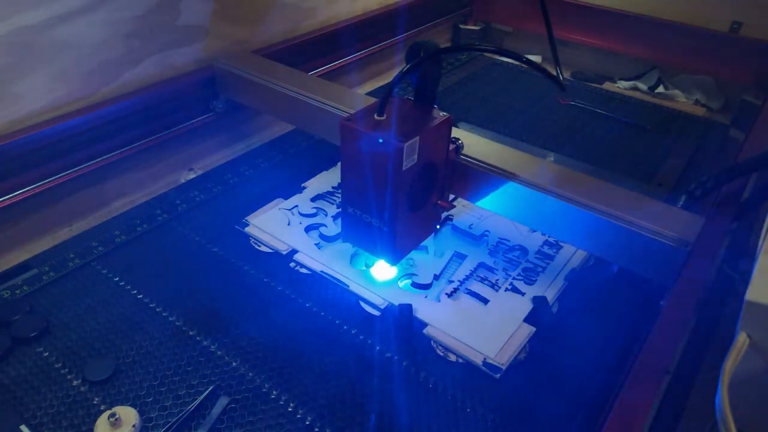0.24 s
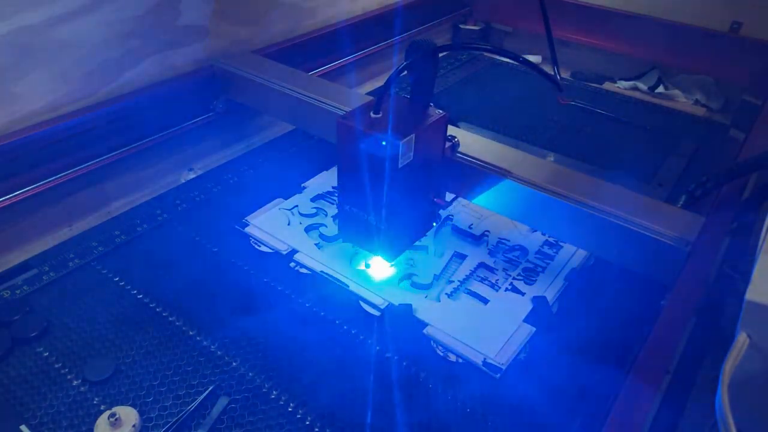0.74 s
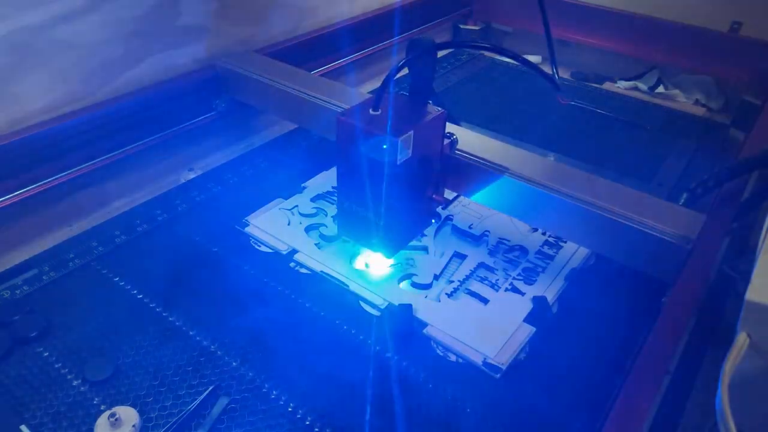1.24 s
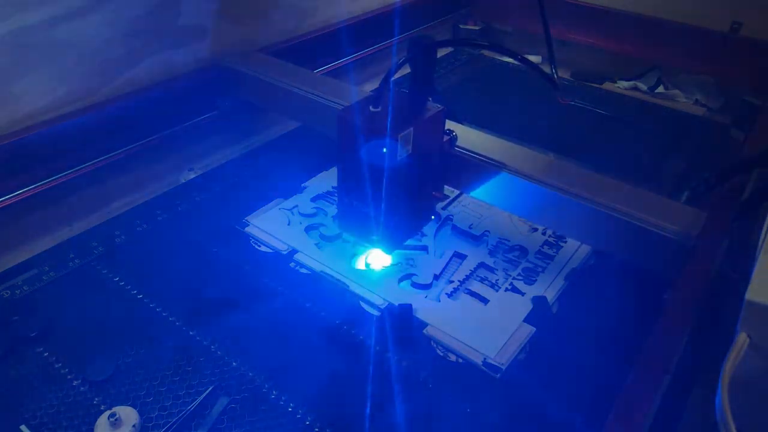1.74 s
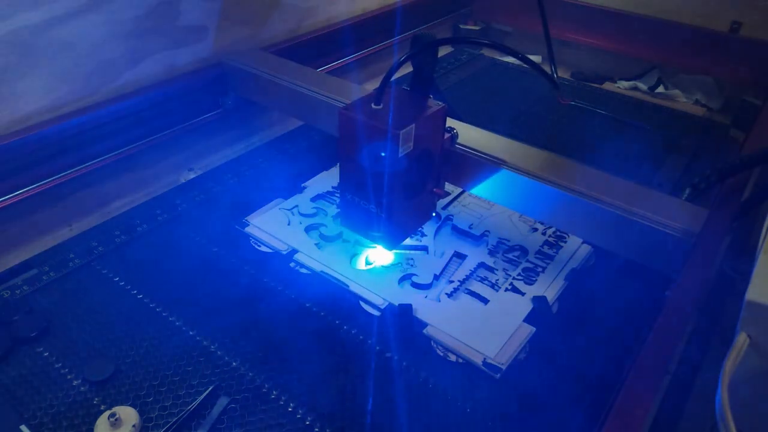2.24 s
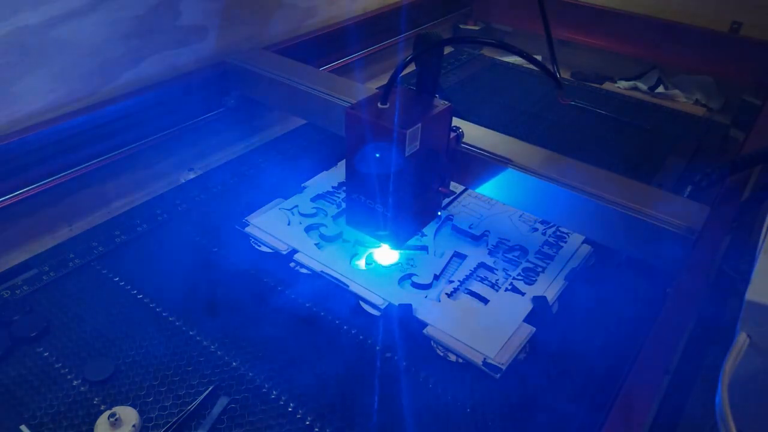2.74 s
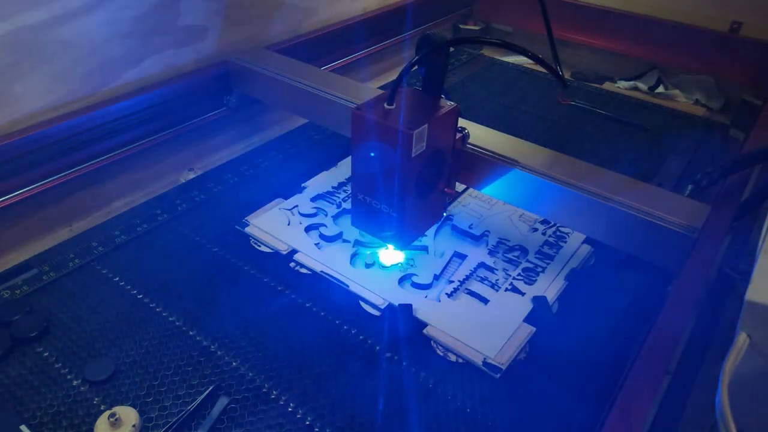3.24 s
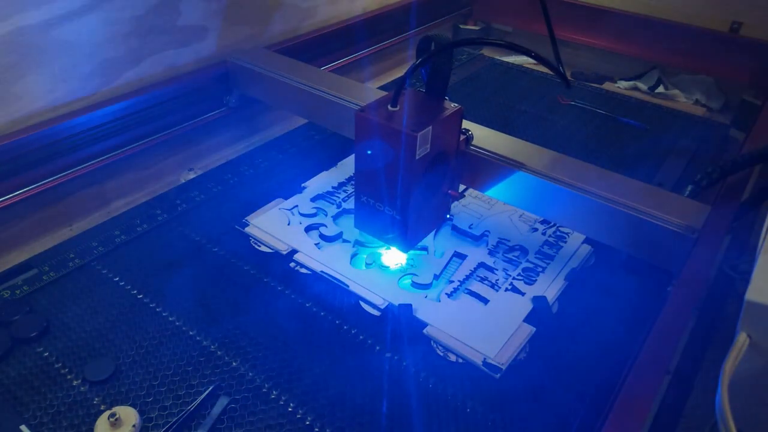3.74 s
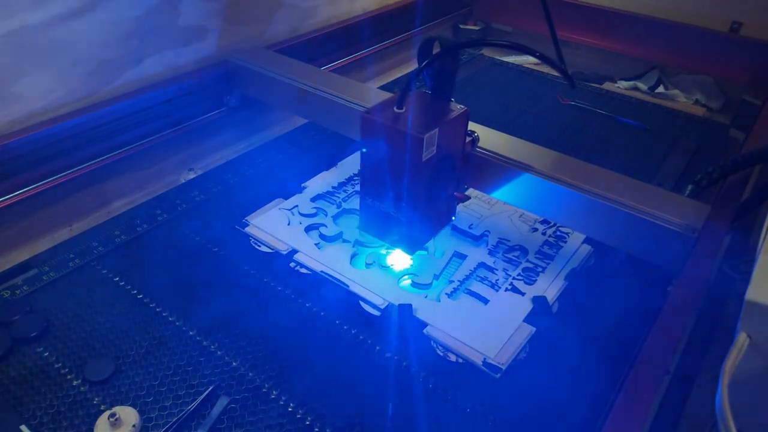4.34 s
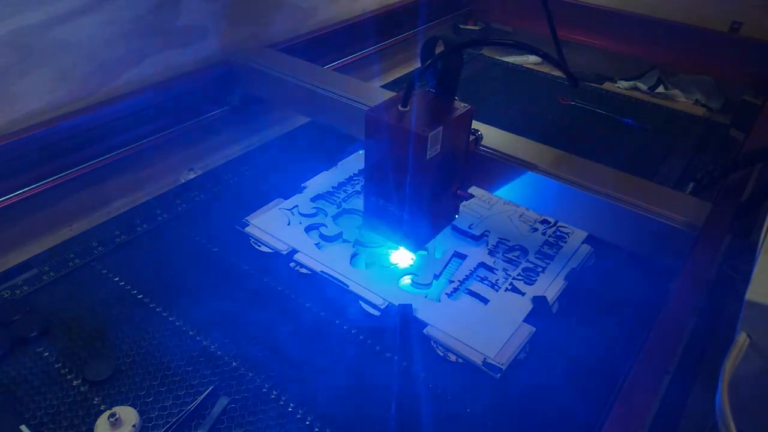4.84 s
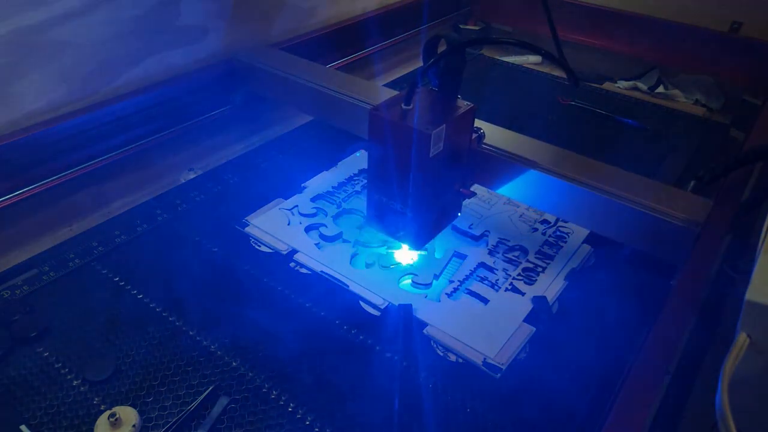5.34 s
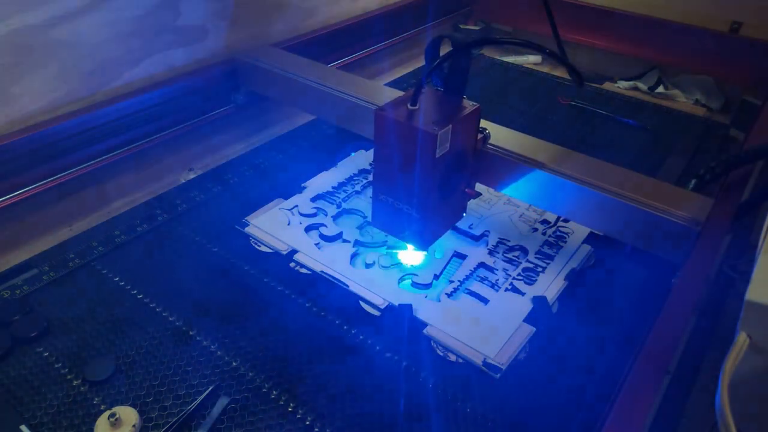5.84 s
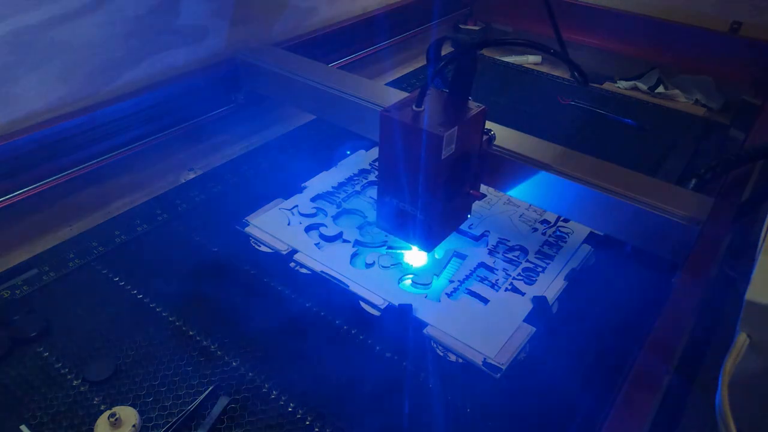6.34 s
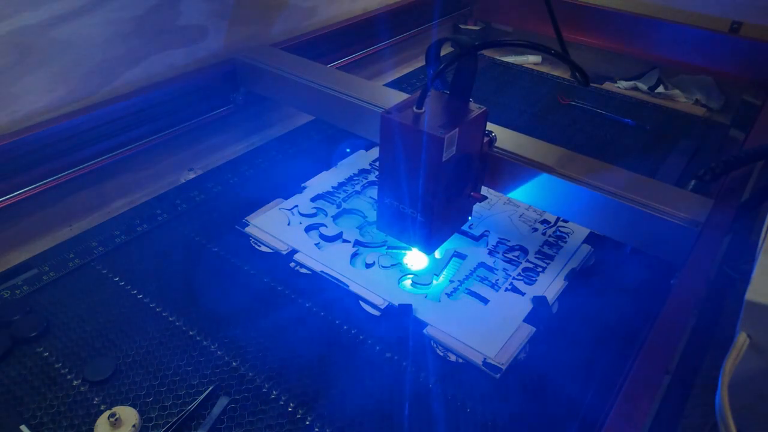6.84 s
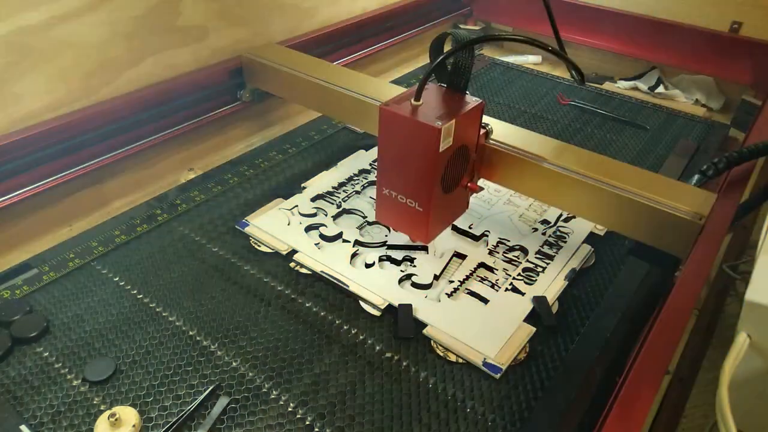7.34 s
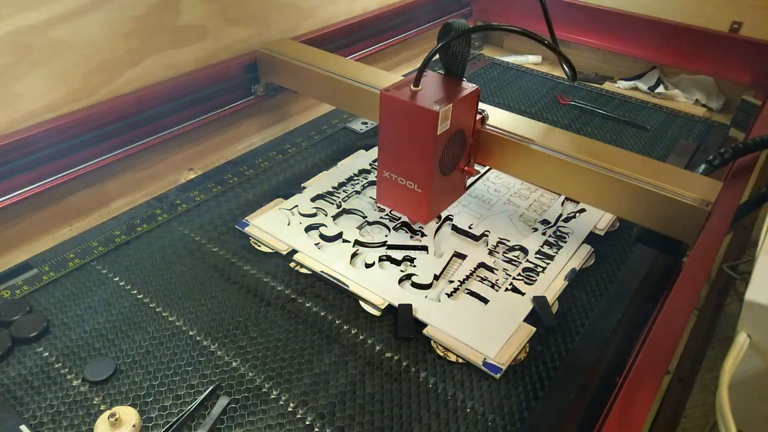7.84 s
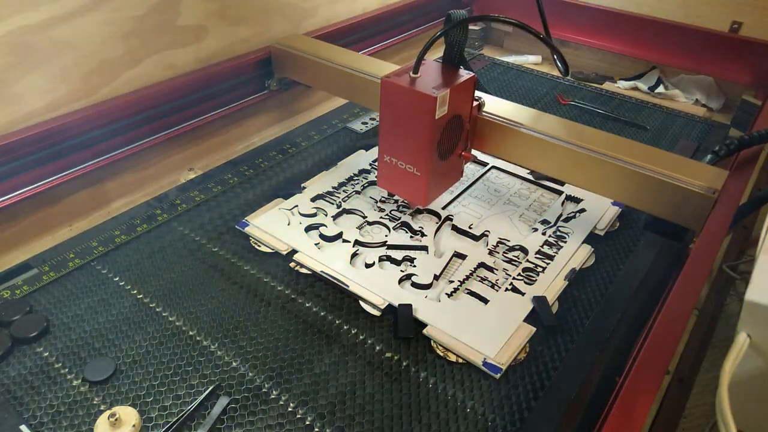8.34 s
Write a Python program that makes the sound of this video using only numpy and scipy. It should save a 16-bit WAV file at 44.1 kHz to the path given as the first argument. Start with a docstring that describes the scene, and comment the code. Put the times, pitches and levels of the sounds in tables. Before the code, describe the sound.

Close up, a small laser cutter squeals with swimming high-pitched overtones amid rushing air and fan whine; the squeal stops abruptly while the airflow continues.

```python
"""The chopped beam of a small laser cutter sings: three steady overtones of its pulse rate, until it stops.
Two nine-blade fans in the head whine at multiples of their shaft turn, and an air jet hisses as noise bands.
Shaped noise makes the exhaust rush, box modes and dull bumps; sines make the pump hum.
The beam and the loud fan tones meet echoes that slide in and out of step as the head moves, so they swim
differently at each of two microphones close by."""
import sys
import numpy as np
from scipy import signal
from scipy.fft import rfft, irfft, next_fast_len
from scipy.io import wavfile
from scipy.ndimage import uniform_filter1d

SR = 44100
rng = np.random.default_rng(int(sys.argv[2]) if len(sys.argv) > 2 else 0)


def put_to_file(sound):
    """Save the sound as 16-bit audio at rate SR, in the file named by the first command-line argument."""
    columns = np.atleast_2d(sound).T  # one column per channel
    safe = np.clip(columns, -1, 1)
    whole_steps = np.round(safe * 32767)
    wavfile.write(sys.argv[1], SR, whole_steps.astype(np.int16))


N = 378819
STEP = 32  # samples between updates of the head position and its echoes

# Path of the head over the bed. Each row: time in seconds, across in cm, along in cm.
HEAD_PATH = [(0.0, 1.55, 0.76), (0.3, 1.54, 1.05), (0.6, 1.14, 1.53), (1.2, 0.51, 0.96), (1.8, 0.38, 0.94),
             (2.3, 0.16, 0.22), (2.8, 0.44, 0.08), (3.4, 1.42, -0.21), (3.9, 2.1, -0.81),
             (4.5, 2.18, -1.04), (4.75, 2.24, -1.21), (5.1, 2.47, -1.11), (5.7, 2.76, -1.42),
             (6.4, 3.5, -1.95), (6.9, 3.57, -1.72), (7.25, 3.38, -1.48), (7.4, 3.74, -0.26),
             (7.55, 3.74, -0.16), (7.85, 3.78, 0.77), (8.05, 4.16, 0.52), (8.2, 4.37, 0.26),
             (8.4, 4.65, 0.01), (8.59, 4.8, -0.08)]
# The jet's strongest whistle, and its top band on the left. Each row: time in seconds,
# whistle level on the right in dB, change of the top band's left level in dB.
WHISTLE_LEVELS = [(0, -41, -9), (2.1, -51, -5), (2.6, -45, -5), (3.2, -44, -1.5), (5.2, -46, -4.5),
                  (5.6, -29.5, 3), (6.3, -23, -1), (6.8, -37, -6), (7.3, -42, -6), (7.48, -28, -5),
                  (7.62, -49, -14), (8.59, -37.5, -9)]
# How alike noise is on both sides. Each row: frequency in Hz, likeness from 0 to 1.
SIDE_LIKENESS = [(60, .9), (130, 0.96), (290, 0.9), (640, 0.35), (1400, 0.17), (3000, 0.74), (16000, 1)]


def undb(db):
    """Turn decibels into gain."""
    return 10 ** (np.asarray(db) / 20)


def columns(table):
    """Draw each column after the time as a curve at the sample rate."""
    seconds, *values = np.transpose(table)
    return np.array([np.interp(np.arange(N) / SR, seconds, v) for v in values])


def unit(x):
    """Scale to an rms of 1."""
    return x / np.sqrt(np.mean(x ** 2, axis=-1, keepdims=True))


def walk(rate):
    """Wander at random: levels held for 1 / rate seconds, smoothed twice, with a spread near 1."""
    hold = int(SR / rate)
    steps = np.repeat(rng.standard_normal(N // hold + 1), hold)
    return 1.55 * uniform_filter1d(uniform_filter1d(steps, hold), hold)[:N]


def quick(x):
    """Take the slow swings out of a random walk by subtracting its average over 0.15 s."""
    return x - uniform_filter1d(x, int(0.15 * SR), axis=-1)


def band(x, hz, width):
    """Keep a band of frequencies, with soft skirts."""
    edges = [hz - width / 2, hz + width / 2]
    return signal.sosfilt(signal.butter(2, edges, "bandpass", fs=SR, output="sos"), x)


def on_log(points, hz):
    """Read a (Hz, value) table on a log-frequency axis."""
    at, value = np.transpose(points)
    return np.interp(np.log(hz + 1), np.log(at), value)


def sides(left, right):
    """Stack a left and a right number so that they act on two channels."""
    return np.array([[left], [right]])


def apart(x):
    """Give no phase on the left and x radians on the right."""
    return np.array([0 * x, x])


def tone(turns, db, flutter_db, phase):
    """A sine in both channels, whose level flutters, most where the tone has faded."""
    flutter = quick(0.76 * walk(28) + 1.33 * walk(70) + 0.37 * np.array([walk(45), walk(45)]))
    faded_db = np.max(db, axis=-1, keepdims=True) - db
    # 0.7 of the flutter at the loudest moment, one more share for every 21 dB of fade
    depth_db = flutter_db * np.clip(0.7 + faded_db / 21, 0, 2)
    gain = unit(undb(depth_db * np.tanh(flutter / 2) * 2))
    wave = np.cos(2 * np.pi * (turns + rng.random()) + phase)
    return np.sqrt(2) * undb(db) * gain * wave


def travel():
    """Head position across and along in cm, with a fine tremor of the head on its belts."""
    shake_cm = 0.017
    path = columns(HEAD_PATH) + shake_cm * quick(np.array([walk(30), walk(30)]))
    return path[:, ::STEP]


def path_wave(hz, across, along, lag, place):
    """Phase turn of a tone over a path whose length follows the head; lag is in cycles."""
    sound_cm_s = 34300
    path_cm = across * place[0] + along * place[1]
    return np.exp(2j * np.pi * (hz * path_cm / sound_cm_s + lag))


def standing(rows, leads, hz, place):
    """Level in dB and phase per side: direct sound and echoes add or cancel as their paths change."""
    heard = []
    for (db, *echo_values), f in zip(rows, np.repeat(hz, 2)):
        paths = np.reshape(echo_values, (-1, 4))
        reflected = sum(gain * path_wave(f, *path, place) for gain, *path in paths)
        heard.append(undb(db) * (1 + reflected))
    heard = np.reshape(heard, (len(hz), 2, -1))
    heard[:, 1] *= [path_wave(f, *path, place) for f, path in zip(hz, leads)]
    level_db, phase = 20 * np.log10(np.abs(heard) + 1e-9), np.angle(heard)
    return [np.repeat(x, STEP, axis=2)[..., :N] for x in (level_db, phase)]


def beam(place):
    """The pulsed beam pops the hot surface: three overtones, roughened by burning, until it is off."""
    pulse_hz, beam_off_s = 4882.8, 7.268
    jitter_turns, trim_db = 0.027, 0.3  # timing scatter of the burning; gain over the table
    # Overtones 1 to 3, left row then right row. Each row: direct level in dB before the trim, then for
    # each of five echoes: gain, path in cm per cm across, path in cm per cm along, lag at the origin in cycles.
    beam_echoes = [(-26.0, 0.56, -1.14, -3.91, 0.29, 0.76, -1.98, -3.75, 0.85, 0.77, -0.51, -0.04, 0.55, 0.25, 3.17, 0.98, 0.2, 0.22, -3.76, -3.32, 0.52),
                   (-31.5, 0.79, 2.59, -2.85, 0.7, 1.07, 0.52, 1.59, 0.59, 0.68, 2.79, -3.19, 0.04, 1.08, -2.0, 3.59, 0.5, 1.04, -2.29, 3.76, 0.15),
                   (-24.9, 0.29, 1.77, 1.49, 0.55, 0.23, -1.11, -3.21, 0.3, 0.16, 3.37, -4.01, 0.57, 0.5, 2.88, -0.43, 0.32, 0.3, -0.39, 0.54, 0.06),
                   (-18.5, 0.13, 0.92, 4.01, 0.33, 0.15, 4.01, 0.61, 0.95, 0.4, -1.94, -1.33, 0.99, 1.31, -0.49, -0.64, 0.56, 0.58, -0.66, -2.46, 0.38),
                   (-30.1, 0.52, 1.79, 0.81, 0.07, 0.32, -2.7, -2.02, 0.41, 0.56, 1.71, -0.86, 0.46, 0.1, -1.1, 2.59, 0.61, 0.37, -1.95, -1.9, 0.74),
                   (-31.7, 0.49, -1.9, -3.02, 0.62, 0.23, 2.21, 1.79, 0.35, 0.58, -0.62, -2.24, 0.48, 0.21, 0.17, -3.54, 0.91, 1.31, -0.43, -0.83, 0.5)]
    # Lead of the right side. Each row: path in cm per cm across, in cm per cm along, lead at origin in cycles.
    beam_leads = [(-0.21, 1.19, 0.9), (0.58, 0.44, 0.59), (-0.02, 0.16, 0.84)]
    t = np.arange(N) / SR
    dbs, phases = standing(beam_echoes, beam_leads, pulse_hz * np.arange(1, 4), place)
    rough = undb(-15.0) * unit(band(rng.standard_normal(N), 233, 460))
    flutters_db, phase_drifts = (1.28, 2, 1.5), (0.3, 0.35, 0.3)
    overtones = []
    for k, db, phase, flutter_db, drift in zip((1, 2, 3), dbs, phases, flutters_db, phase_drifts):
        turns = k * pulse_hz * t + jitter_turns * walk(110)
        overtones.append(tone(turns, db + trim_db, flutter_db, phase + apart(drift * walk(10))))
    low, mid, high = overtones
    switch = np.clip((beam_off_s - t) / 0.02, 0, 1)
    return (low + mid * stutter() * (1 + rough) + high * (1 + 0.72 * rough)) * switch


def stutter():
    """Gain of the beam's second overtone, with brief irregular dips inside the listed stretches."""
    # Each row: start in seconds, end in seconds, dB per unit of the random dips.
    stretches = [(1.97, 2.42, 8), (2.69, 3.16, 10), (3.8, 4.2, 5), (4.32, 5.0, 7), (6.35, 6.95, 5)]
    t = np.arange(N) / SR
    depth_db = sum(db * (t > start) * (t < end) for start, end, db in stretches)
    dips = np.clip(quick(walk(38)), -.3, 1.5)  # negative values lift the level a little
    return undb(-uniform_filter1d(depth_db, SR // 50) * dips)


def fans(place):
    """Two fans whine; their shafts speed up when the laser stops loading the supply."""
    # Each row: time in seconds, fan A turns per second, fan B turns per second.
    shaft_speeds = [(0, 123.02, 128.13), (1.5, 122.84, 128.05), (3, 122.84, 128.06), (4.75, 123.07, 128.05),
                    (6, 122.86, 128.06), (7.25, 122.92, 128.05), (7.5, 124.06, 129.29),
                    (7.75, 124.58, 129.85), (8, 124.63, 130.0), (8.59, 124.74, 130.08)]
    # Loud tones of each fan, left row then right row. Each row: direct level in dB before a trim, then for
    # each of five echoes: gain, path in cm per cm across, path in cm per cm along, lag at the origin in cycles.
    a_echoes = [(-41.7, 1.28, -2.08, 1.79, 0.66, 0.7, -3.58, 1.72, 0.27, 0.68, 1.57, 1.67, 0.4, 0.5, 0.33, 3.48, 0.99, 0.22, -0.48, -3.98, 0.55),
                (-55.7, 1.0, -3.99, -0.85, 0.35, 0.17, 3.92, -3.21, 0.28, 0.87, -2.4, -0.89, 0.71, 0.64, -2.81, -0.28, 0.9, 0.14, -0.77, 2.55, 0.9),
                (-45.5, 0.56, -1.38, -3.9, 0.84, 0.55, -2.4, -4.0, 0.39, 0.3, 2.84, -3.32, 0.8, 0.34, -1.49, 2.65, 0.66, 0.56, 1.76, 1.03, 0.28),
                (-35.3, 0.69, 1.14, 1.1, 0.32, 0.45, -1.32, -0.63, 0.66, 0.15, 1.33, -4.0, 0.34, 0.43, 0.06, -0.38, 0.49, 0.15, -2.65, 4.0, 0.15),
                (-30.6, 1.1, 0.21, 0.11, 0.47, 0.9, 2.71, 0.98, 0.71, 0.23, 1.09, -1.33, 0.98, 0.93, 2.53, 0.55, 0.25, 0.06, -2.96, -4.0, 0.01),
                (-30.5, 1.23, 0.19, 0.12, 0.45, 0.29, 1.82, 0.88, 0.03, 0.11, 0.99, -3.55, 0.44, 0.54, 1.35, 0.72, 0.64, 0.11, 1.13, -4.0, 0.91),
                (-25.6, 1.01, -0.08, 0.09, 0.53, 0.1, 1.39, -0.56, 0.06, 0.1, -4.0, -0.88, 0.13, 0.08, -3.08, 1.61, 0.73, 0.03, 4.0, 2.94, 0.3),
                (-44.0, 0.77, -0.53, 0.44, 0.61, 0.93, -2.11, 1.04, 0.03, 0.93, -3.01, -0.79, 0.55, 0.29, 2.51, -3.83, 0.91, 0.42, 3.08, 2.55, 0.39),
                (-28.4, 0.31, -1.91, 0.55, 0.9, 1.3, 0.08, -0.27, 0.47, 0.53, -1.41, -1.06, 0.22, 0.37, -2.98, -0.01, 0.72, 0.1, 3.61, 0.86, 0.21),
                (-26.3, 0.46, -1.5, 0.77, 0.58, 0.04, 3.36, -1.51, 0.42, 0.9, -0.29, -0.11, 0.58, 0.42, -1.95, 0.57, 0.19, 0.16, 2.1, -0.73, 0.16),
                (-51.3, 0.58, -1.58, -3.71, 0.68, 0.76, 0.35, 1.43, 0.56, 1.07, 1.54, -3.52, 0.16, 0.73, 3.7, 2.66, 0.3, 0.95, 1.02, -4.0, 0.79),
                (-32.3, 0.48, -2.24, -1.41, 0.94, 0.96, 0.15, -0.11, 0.48, 0.12, -3.17, 2.05, 0.74, 0.11, -2.07, 3.52, 0.01, 0.31, -2.58, -2.15, 0.52)]
    b_echoes = [(-32.2, 1.26, 0.12, 0.76, 0.51, 0.65, -1.83, 0.69, 0.39, 0.78, -1.46, 1.65, 0.87, 0.06, 2.99, -2.8, 0.17, 0.43, 0.49, 3.31, 0.15),
                (-37.6, 0.29, -0.92, 0.24, 1.0, 0.82, 0.57, 1.27, 0.5, 0.1, 2.89, 0.74, 0.43, 0.43, -1.23, -1.86, 0.55, 0.16, -0.72, 1.45, 0.37),
                (-40.6, 1.0, 4.0, 2.7, 0.9, 0.68, 1.18, 0.11, 0.29, 0.12, 3.77, -2.58, 0.4, 0.5, -2.7, -1.0, 0.72, 1.3, 3.35, 2.23, 0.44),
                (-23.2, 0.88, -1.27, 0.08, 0.65, 0.44, -2.33, 0.14, 0.28, 0.57, 0.75, 0.11, 0.4, 0.04, -1.31, -2.29, 0.98, 0.07, -1.63, 4.0, 0.84),
                (-41.1, 0.38, -3.5, -0.72, 0.09, 1.01, 0.49, 0.19, 0.43, 1.07, -0.9, 2.62, 0.83, 0.94, -1.26, 2.36, 0.39, 0.13, -1.32, -4.0, 1.0),
                (-34.4, 0.51, 0.44, -3.03, 0.32, 0.09, 0.73, 3.15, 0.92, 0.85, -0.13, -0.08, 0.51, 0.12, 2.9, -0.35, 0.4, 0.43, 0.18, -3.54, 0.87),
                (-48.1, 1.21, -0.36, -0.96, 0.54, 0.57, -0.72, -2.04, 0.07, 0.61, 0.04, 2.65, 0.82, 0.4, -1.79, 3.64, 0.49, 0.15, 3.93, -1.49, 0.52),
                (-39.1, 0.43, 1.04, 0.76, 0.28, 0.63, -0.62, -0.29, 0.63, 0.43, 1.04, -2.78, 0.59, 0.42, 0.61, -2.96, 0.2, 0.21, -2.62, 0.39, 0.56),
                (-32.1, 0.25, 1.6, -4.0, 0.1, 0.69, 0.09, 0.6, 0.53, 0.59, -1.76, -1.91, 0.82, 0.55, -1.86, -1.51, 0.39, 0.3, 3.4, -1.45, 0.29),
                (-33.8, 1.09, 0.52, 0.19, 0.26, 0.5, 1.36, -3.85, 0.9, 0.68, 1.03, -3.18, 0.57, 0.33, -2.14, -2.83, 0.97, 0.56, 1.41, 0.15, 0.37),
                (-35.7, 0.72, 0.14, -0.52, 0.48, 0.12, 3.23, 1.75, 0.29, 0.36, -0.06, 1.26, 0.53, 0.04, 2.75, -1.64, 0.78, 0.24, -1.12, 1.4, 0.27),
                (-39.2, 0.42, 1.43, 2.68, 0.38, 0.81, -0.04, -0.65, 0.45, 0.11, -3.99, 0.6, 0.73, 0.29, -2.62, -2.95, 0.1, 0.25, -1.36, -0.07, 0.67)]
    # Lead of the right side. Each row: path in cm per cm across, in cm per cm along, lead at origin in cycles.
    a_leads = [(-1.35, -1.09, 0.17), (-2.53, -2.97, 0.63), (-0.97, -2.66, 0.17), (-2.0, 0.77, 0.46),
               (-3.84, -2.17, 0.39), (0.81, -0.39, 0.63)]
    b_leads = [(-1.12, 1.77, 0.99), (-3.79, -0.17, 0.45), (-3.75, -1.11, 0.15), (2.03, 4.0, 0.09),
               (0.24, 1.58, 0.73), (-0.07, 1.4, 0.57)]
    # Mean levels of the faint tones. Each row: left in dB, right in dB.
    a_faint_db = [(-66, -65), (-57, -57), (-52, -52)]
    b_faint_db = [(-70, -64), (-68, -79), (-53, -58), (-44, -56)]
    # the shafts hunt a little about their speed, which blurs the higher multiples
    hunting = 0.084 * np.array([walk(26), walk(26)])
    turns_a, turns_b = np.cumsum(columns(shaft_speeds) + hunting, axis=1) / SR
    loud_a, faint_a = (9, 18, 27, 36, 45, 46), (2, 50, 54)  # multiples of the shaft turn
    loud_b, faint_b = (9, 18, 27, 36, 45, 54), (5, 12, 53, 81)
    # 123 and 128 Hz: rounded shaft rates, used only for the echoes
    fan_a = fan(place, turns_a, 123, loud_a, a_echoes, a_leads, faint_a, a_faint_db)
    fan_b = fan(place, turns_b, 128, loud_b, b_echoes, b_leads, faint_b, b_faint_db)
    return fan_a + fan_b


def fan(place, turns, shaft_hz, loud, rows, leads, faint, faint_db):
    """Sines at multiples of the shaft turn: loud ones meet echoes, faint ones fade in and out at random."""
    trim_db = 0.7  # gain of the loud tones over their table
    dbs, phases = standing(rows, leads, shaft_hz * np.array(loud), place)
    out = 0
    for k, db, phase in zip(loud, dbs, phases):
        out = out + tone(k * turns, db + trim_db, 1.87, phase + apart(0.23 * walk(9)))
    for k, db in zip(faint, faint_db):
        fading_db = sides(*db) + 3.5 * np.array([walk(0.8), walk(0.88)])
        out = out + tone(k * turns, fading_db, 2.5, apart(0.92 + 0.28 * walk(0.22)))
    return out


def jet():
    """Broad hiss of the air jet; its top band rings between bed and lid, combed into close whistles."""
    # The jet swells over cuts and edges. Each row: time in seconds, left level in dB, right level in dB.
    jet_swell = [(0, -2, -1), (.4, 2.5, -1), (1.0, 3, 3.5), (1.25, -4, -1.5), (1.75, -2, -2), (2.1, -7, -4),
                 (2.75, 1.5, -3), (3, 2, -1), (3.4, -6, -5.5), (4, -3, -4.5), (4.5, -2.5, -9.5),
                 (5.25, -1.5, -5), (5.75, 0, 1.5), (6, -2, -5), (6.3, 5, 5), (6.5, 5.5, 2), (6.75, 1, 2.5),
                 (7.25, 7, 1.5), (7.5, -2.5, -10), (7.75, -0.5, 1), (8, -6.5, -6.5), (8.59, -2.5, 1.5)]
    # Each row: left centre and width in Hz, right centre and width in Hz, left and right level in dB before
    # the swell, share of the swell from 0 to 1, left and right change in dB per cm across.
    jet_bands = [(5260, 1420, 4960, 2500, -37.5, -44, 0.39, 0.38, 2.5),
                 (6990, 860, 7260, 1420, -33.5, -31, 0.77, 0.18, -0.46),
                 (8700, 1630, 8910, 800, -29.5, -25, 1, 0.08, -0.42),
                 (10270, 430, 10230, 1730, -30, -24.5, 0.058, .1, 0.03)]
    bed_lid_samples, bed_lid_gain = 144, .3  # time and loss of one round trip
    grain_db = 1.5  # each band flickers on its own
    whistle_quiet_db, whistle_lift = -42.5, 0.31  # the top band on the right rises with the whistle
    comb = np.zeros(bed_lid_samples + 1)
    comb[[0, -1]] = 1, -bed_lid_gain
    heard = echoes(np.tile(rng.standard_normal(N), (2, 1)))
    swell, across = columns(jet_swell), columns(HEAD_PATH)[0]
    whistle_db, top_left_db = columns(WHISTLE_LEVELS)
    out = undb(whistle_db + sides(-16, 0)) * unit(band(heard, 10710, 180))
    for row in jet_bands:
        hiss = np.array([band(heard[0], *row[:2]), band(heard[1], *row[2:4])])
        db = sides(*row[4:6]) + row[6] * swell + sides(*row[7:]) * across
        if row is jet_bands[-1]:
            hiss = signal.lfilter([1], comb, hiss)
            db[0] += top_left_db
            db[1] += whistle_lift * (whistle_db - whistle_quiet_db)
        out = out + undb(db + grain_db * quick(walk(35))) * unit(hiss)
    return out


def echoes(x):
    """Add late copies that wax, wane and turn over at random: patchy combs at an even level."""
    # Off bed and walls. Each row: left delay in ms, right delay in ms, level in dB.
    bounces = [(1.3, 1.9, -6.5), (2.4, 4.1, -2), (5.3, 6.1, -11), (8.7, 9.9, -15), (13.1, 11.7, -15.5)]
    heard, power = x.copy(), 1
    for *ms, db in bounces:
        gain = undb(db) * np.array([walk(2.493), walk(2.488)])
        heard += gain * np.array([np.roll(x[side], int(ms[side] * SR / 1000)) for side in range(2)])
        power = power + gain ** 2
    return heard / np.sqrt(power)


def spread(mid, side, alike):
    """Mix two noises into left and right; alike = 1 makes both sides the same."""
    mid, side = mid * np.sqrt(1 + alike), side * np.sqrt(1 - alike)
    return np.array([mid + side, mid - side])


def rush():
    """Exhaust and fan rush: shaped noise whose likeness left and right varies with frequency."""
    # Shape of the noise. Each row: frequency in Hz, relative level in dB per Hz.
    rush_shape = [(25, -30), (60, -20), (75, -17), (110, -9.5), (230, -10.5), (290, -20.5), (470, -24.5),
                  (700, -16.5), (1050, -16.5), (1600, -10), (2300, -5.5), (2800, -6), (3900, -9),
                  (7000, -7.5), (12500, -5.5), (14400, -13), (15800, -12.5)]
    rush_db, grain_db = -33, 2.2
    top_follows = .4  # share of the jet's left top-band change that the rush's top follows on the left
    size = next_fast_len(N)
    hz = np.arange(size // 2 + 1) * SR / size
    mid, side = rfft(rng.standard_normal((2, size))) * undb(on_log(rush_shape, hz))
    alike = np.clip(on_log(SIDE_LIKENESS, hz), 0, 1)
    air = irfft(spread(mid, side, alike), size)[:, :N]
    treble = band(air, 8420, 14740)
    air = unit(air - treble + echoes(treble))
    # the middle flickers, band by band
    air += sum((undb(grain_db * quick(walk(30))) - 1) * band(air, at, at / 5)
               for at in (2140, 2730, 3330, 4000, 4730, 5950))
    top_gain = undb(top_follows * columns(WHISTLE_LEVELS)[1])
    air[0] += (top_gain - 1) * band(air[0], 10700, 4000)
    return air * undb(rush_db + 0.8 * walk(1.5) + sides(-.6, .6))


def box():
    """Air modes of the enclosure: narrow noise bands that swell, each with its own level and side lean."""
    # Each row: frequency in Hz, width in Hz, level in dB before a common trim, left minus right in dB.
    modes = [(248, 27, -63.5, 0), (338, 68, -60.5, -6.5), (416, 51, -63, -1), (513.3, 22, -58.5, -1.5),
             (584, 89, -57.5, 2.5), (789, 62, -62.5, -12), (1394, 165, -59.5, 1), (1892, 220, -52.5, -3),
             (2766, 206, -47, 2)]
    # The four modes that swell most, near 515, 590, 1400 and 2750 Hz; only departures from each mean count.
    # Each row: time in seconds, then the level of each of the four in dB.
    mode_swell = [(0.0, -60.5, -61, -52, -47.5), (0.36, -60.5, -52, -47.5, -44),
                  (0.65, -64, -60.5, -53, -46), (0.81, -57, -58, -48, -48.5), (1.1, -61, -52, -53, -45.5),
                  (1.5, -62.5, -58.5, -54.5, -48), (5.14, -61.5, -58.5, -59.5, -47),
                  (5.45, -54, -58, -61.5, -47.5), (7.56, -64, -57, -51, -45), (7.73, -53, -56.5, -55, -44),
                  (8.23, -64, -59, -50, -43.5), (8.42, -55, -55, -63, -51), (8.59, -57, -56, -50, -45)]
    swelling_rows, swell_depth, trim_db = (3, 4, 6, 8), 1.34, -3.5
    curves = columns(mode_swell)
    curves = swell_depth * (curves - curves.mean(axis=1, keepdims=True))
    swell = dict(zip(swelling_rows, curves))
    out = 0
    for k, (hz, width, db, lean_db) in enumerate(modes):
        alike = np.clip(on_log(SIDE_LIKENESS, hz) + 0.34, 0, 1)
        mid, side = unit(band(rng.standard_normal((2, N)), hz, width))
        level_db = db + swell.get(k, 0) + trim_db + 0.9 * walk(2.906) + 2.2 * walk(15)
        out = out + spread(mid, side, alike) * undb(level_db + sides(lean_db, -lean_db) / 2)
    return out


def hum():
    """Pump hum: sines on the mains, one on the motor shaft just below it, a little louder on the right."""
    # Each row: frequency in Hz, mean level of the two sides in dB.
    hum_lines = [(56.9, -77), (60, -78), (120, -47.5), (180, -62.5), (210, -64.5), (240, -66.5)]
    t = np.arange(N) / SR
    return sum(tone(hz * t, db + sides(-.8, .8) + 0.52 * walk(3.06), 0.34, apart(0.15 + 0 * t))
               for hz, db in hum_lines)


def bumps():
    """Dull bumps on the frame: each is a decaying rumble of noise through the frame's broad modes."""
    # Each row: start in seconds, relative level in dB, attack in seconds,
    # time to fall by 60 dB in seconds, tilt of the modes in dB per octave.
    bump_list = [(2.775, -44, 0.05, .4, 2), (2.845, -43.5, .03, 0.3, -1), (2.90, -43, .02, .28, 1),
                 (3.224, -39.5, .01, 0.4, -0.5)]
    # Each row: frequency in Hz, width in Hz, relative level in dB.
    frame_modes = [(97, 57, -17), (122, 42, 1.5), (248, 27, -1), (328, 39, -4.5), (547, 180, -3),
                   (860, 340, 0.5), (1260, 440, -8)]
    pivot_hz = frame_modes[2][0]  # the tilt leaves this mode unchanged
    t, out = np.arange(N) / SR, 0
    noise = rng.standard_normal(N)
    rings = [np.sqrt(SR / 8 / width) * band(noise, hz, width) for hz, width, _ in frame_modes]
    for start, db, attack, t60, tilt_db in bump_list:
        decay = undb(db - 60 * np.clip(t - start - attack, 0, 1) / t60)
        push = decay * np.clip((t - start) / attack, 0, 1) * (t < start + 1)
        rumble = sum(undb(mode_db + tilt_db * np.log2(hz / pivot_hz)) * ring
                     for (hz, _, mode_db), ring in zip(frame_modes, rings))
        out = out + push * rumble
    return out * undb(sides(-.7, .7))


def scene():
    """All sources add up at the two microphones."""
    place = travel()
    return beam(place) + fans(place) + jet() + rush() + box() + hum() + bumps()


def record(dry):
    """Round the loudest peaks and cut the top of the sound."""
    ceiling, top_hz = .8, 15900
    soft = dry / (1 + np.abs(dry / ceiling) ** 6) ** (1 / 6)
    return signal.sosfilt(signal.ellip(10, .2, 95, top_hz, fs=SR, output="sos"), soft)


dry = scene()
out = record(dry)
put_to_file(out)
```